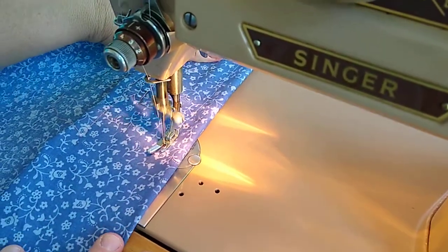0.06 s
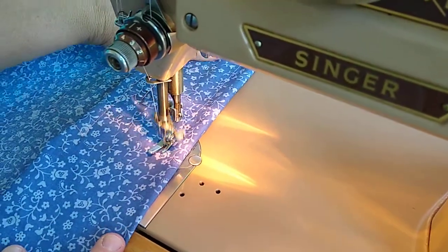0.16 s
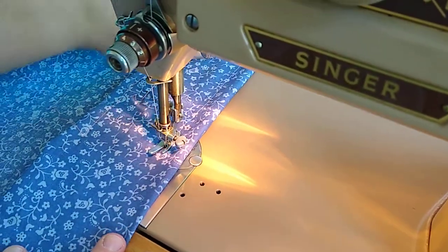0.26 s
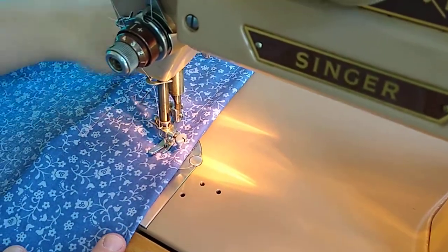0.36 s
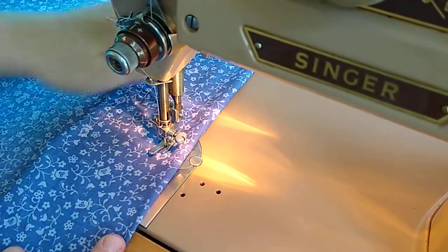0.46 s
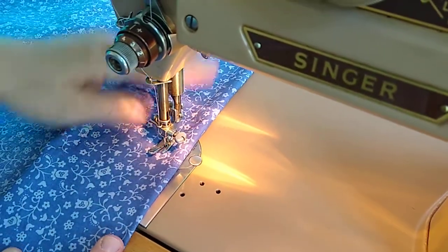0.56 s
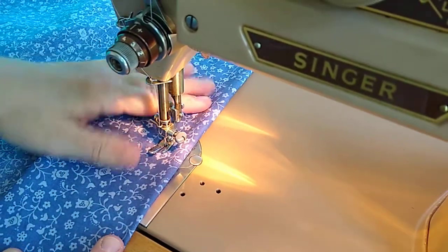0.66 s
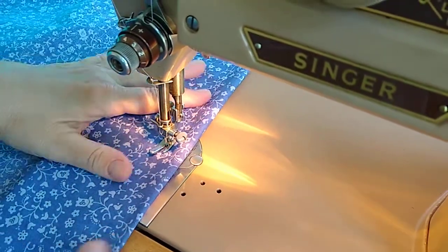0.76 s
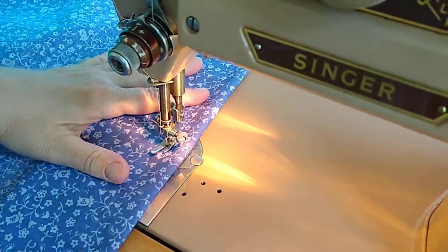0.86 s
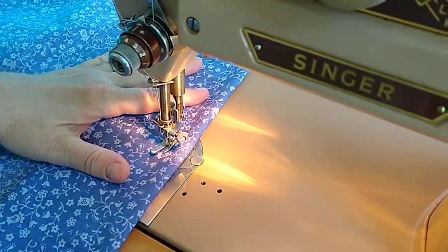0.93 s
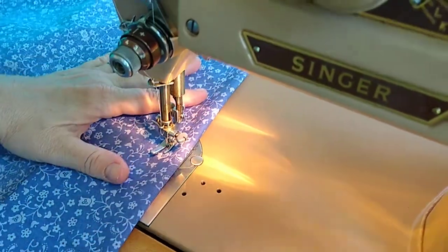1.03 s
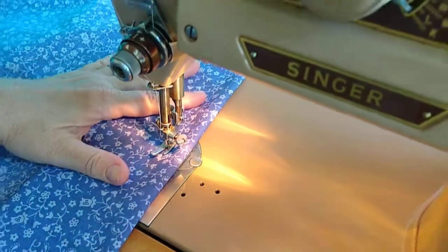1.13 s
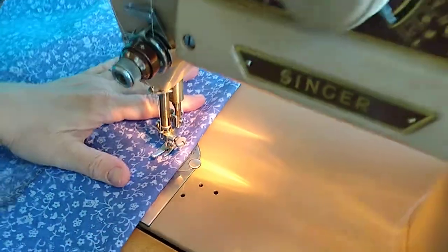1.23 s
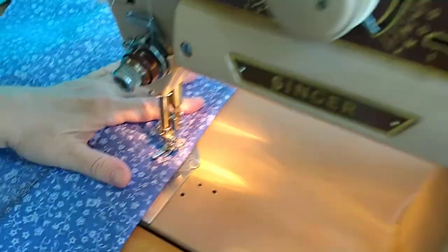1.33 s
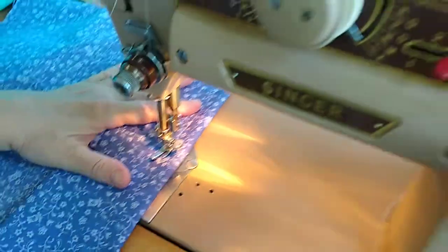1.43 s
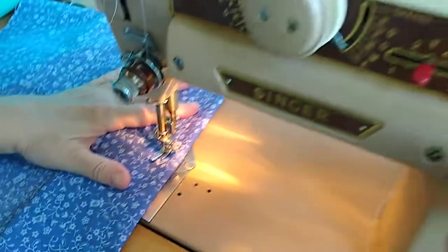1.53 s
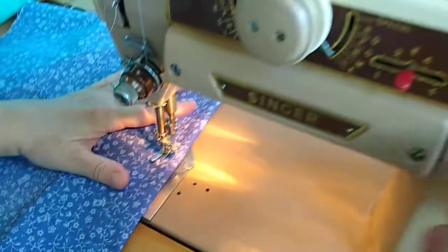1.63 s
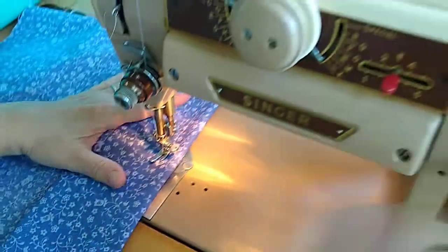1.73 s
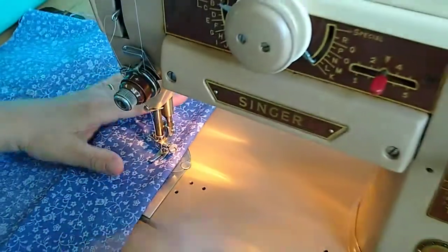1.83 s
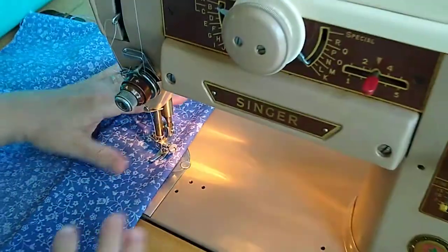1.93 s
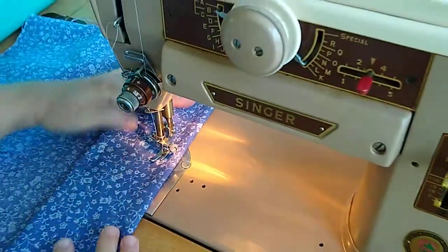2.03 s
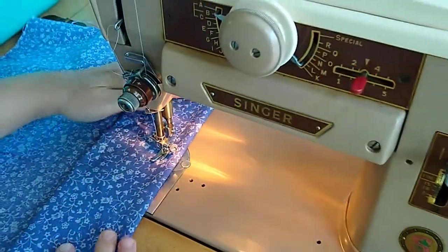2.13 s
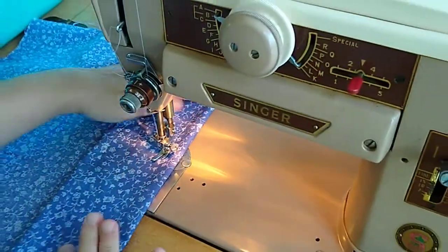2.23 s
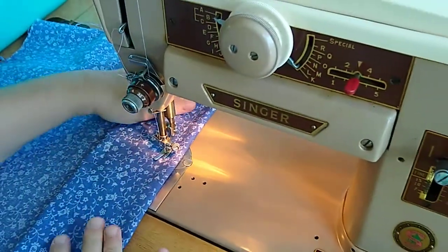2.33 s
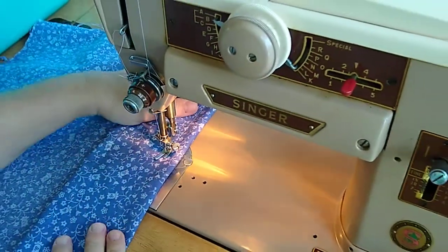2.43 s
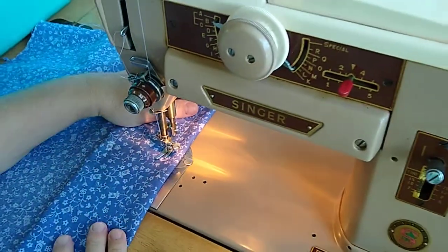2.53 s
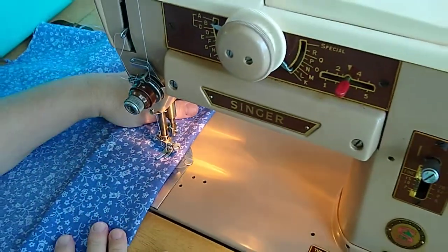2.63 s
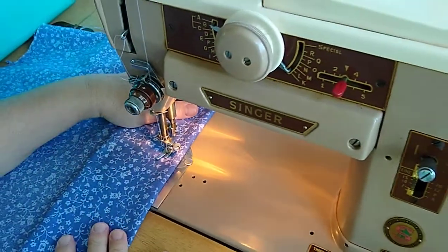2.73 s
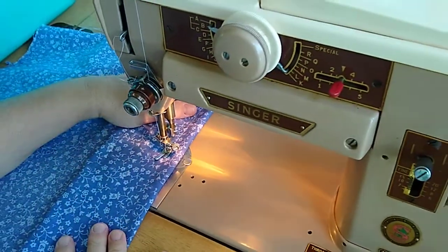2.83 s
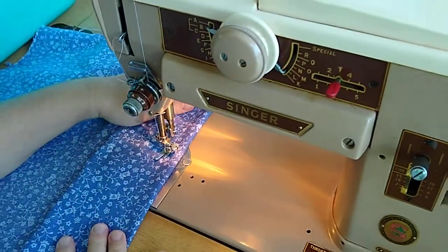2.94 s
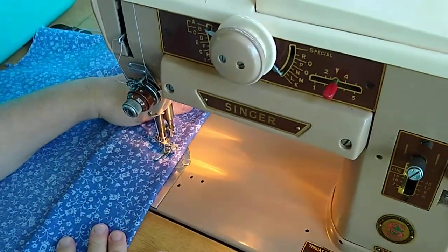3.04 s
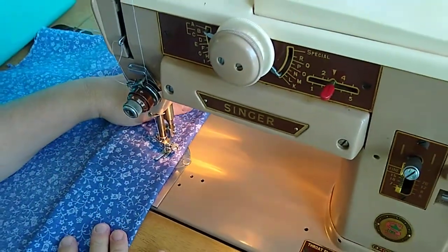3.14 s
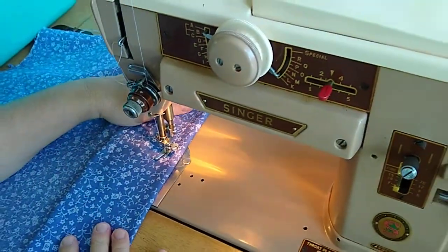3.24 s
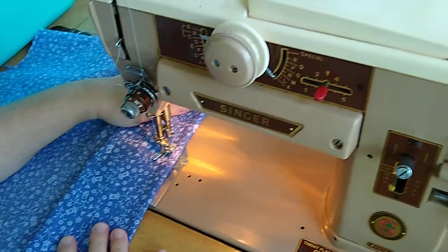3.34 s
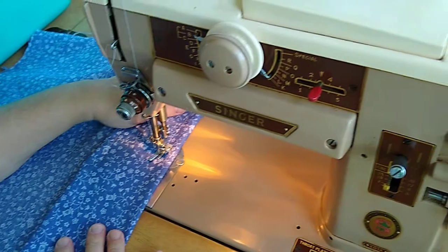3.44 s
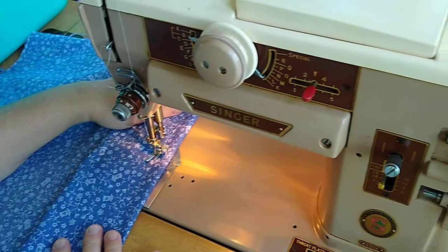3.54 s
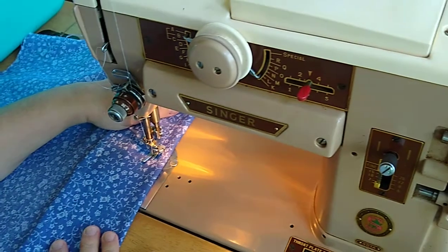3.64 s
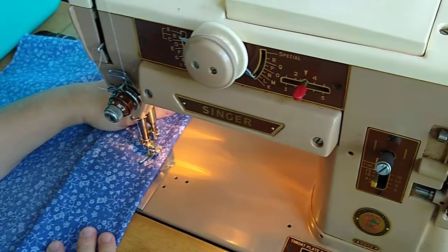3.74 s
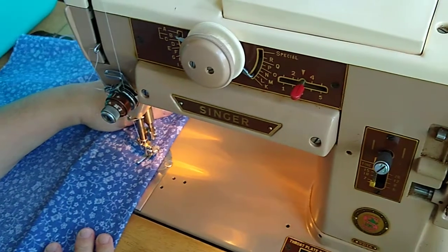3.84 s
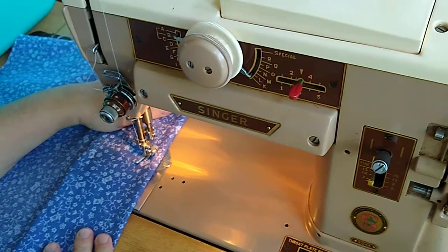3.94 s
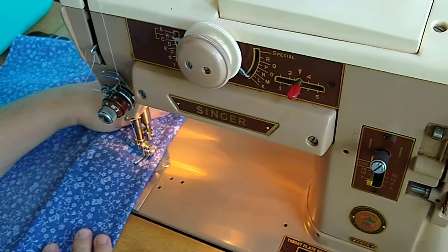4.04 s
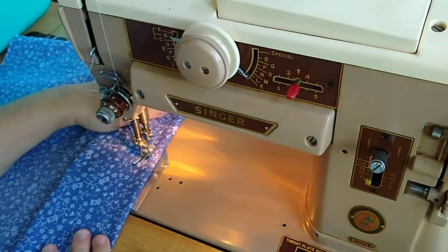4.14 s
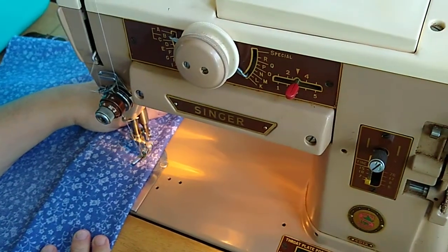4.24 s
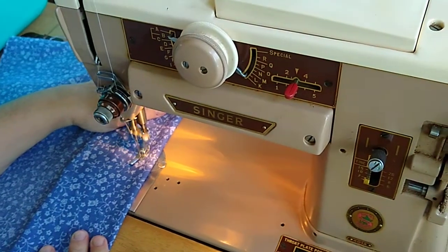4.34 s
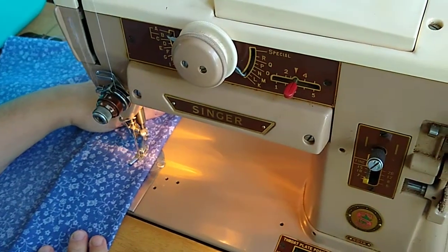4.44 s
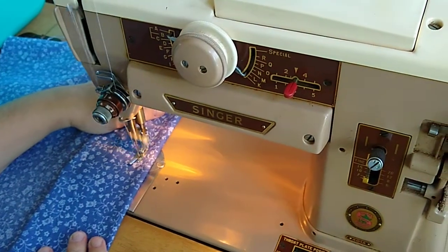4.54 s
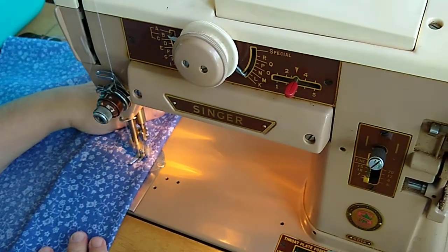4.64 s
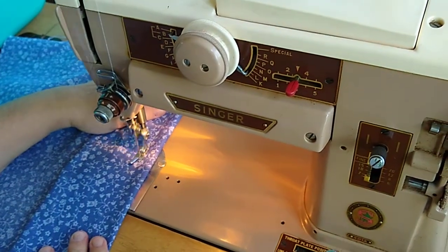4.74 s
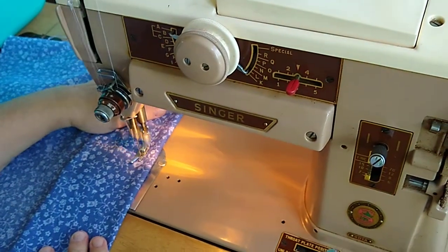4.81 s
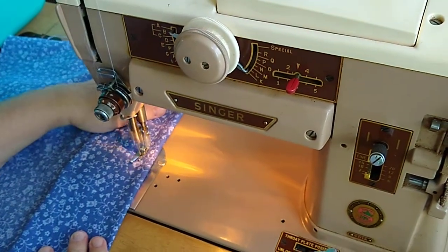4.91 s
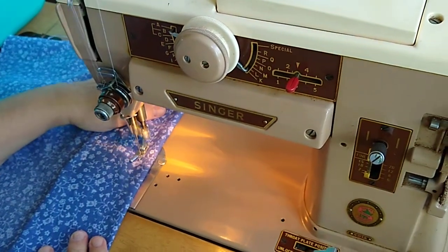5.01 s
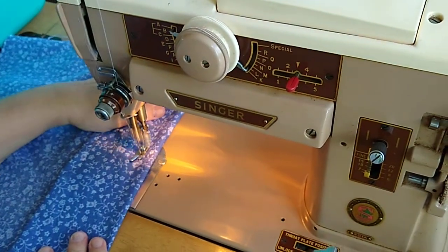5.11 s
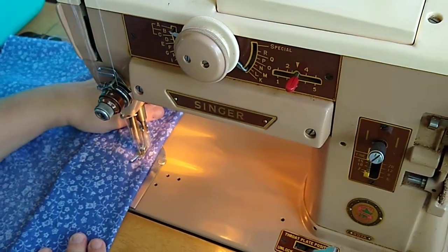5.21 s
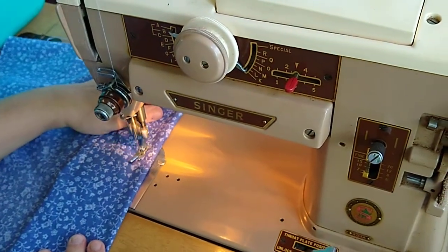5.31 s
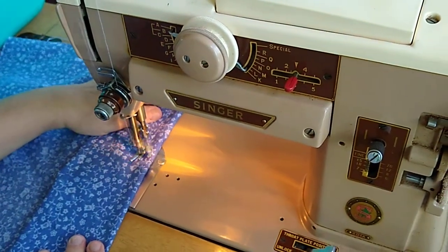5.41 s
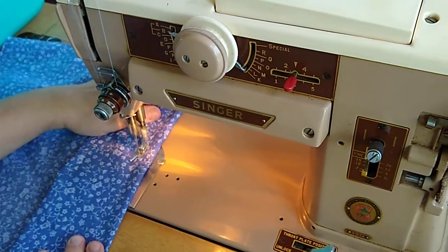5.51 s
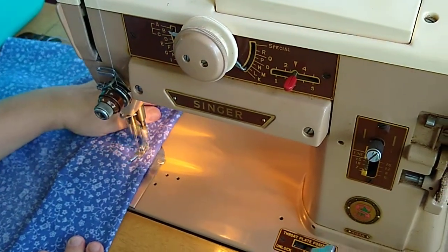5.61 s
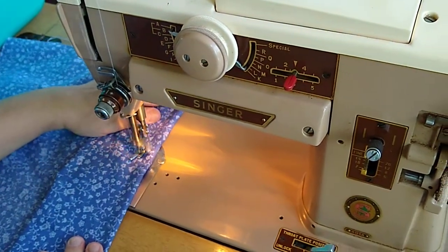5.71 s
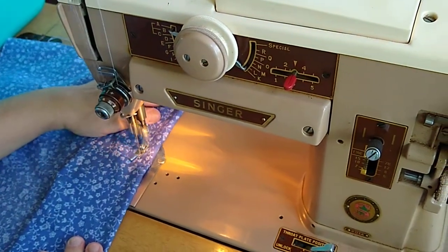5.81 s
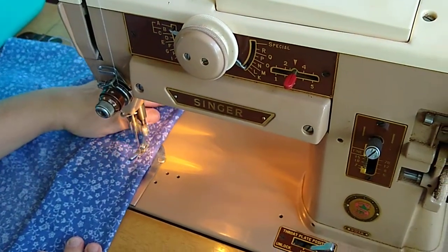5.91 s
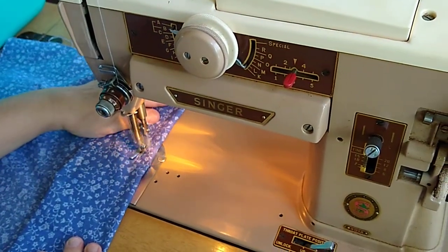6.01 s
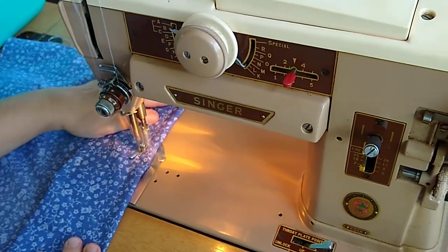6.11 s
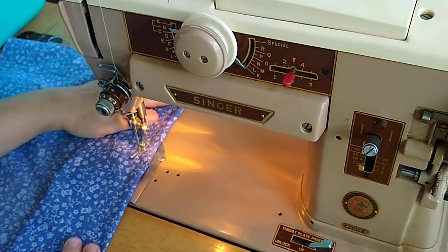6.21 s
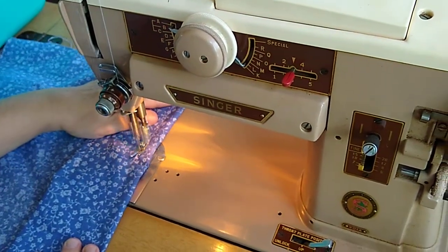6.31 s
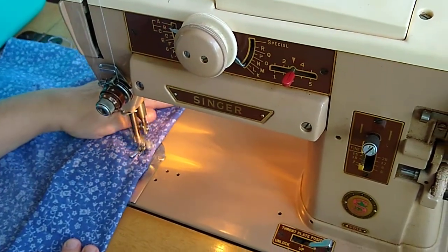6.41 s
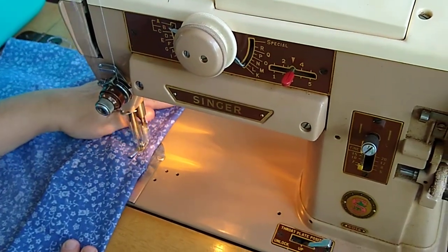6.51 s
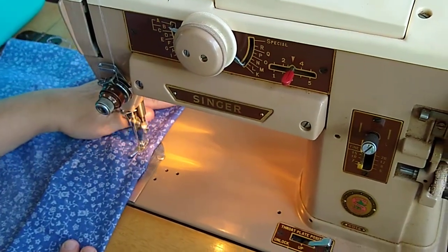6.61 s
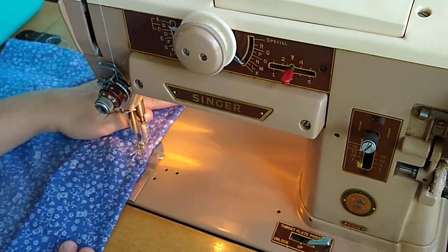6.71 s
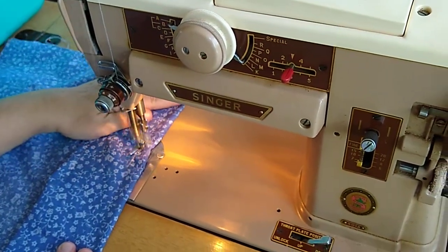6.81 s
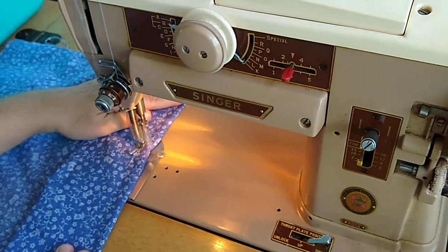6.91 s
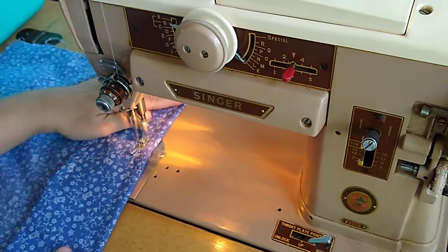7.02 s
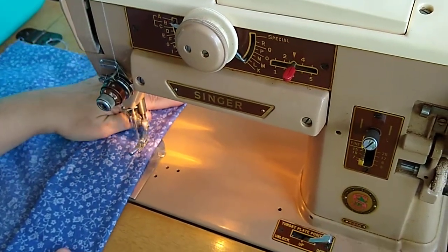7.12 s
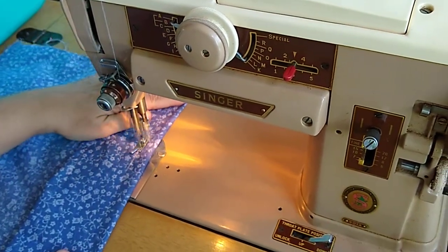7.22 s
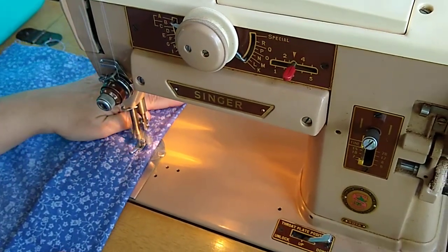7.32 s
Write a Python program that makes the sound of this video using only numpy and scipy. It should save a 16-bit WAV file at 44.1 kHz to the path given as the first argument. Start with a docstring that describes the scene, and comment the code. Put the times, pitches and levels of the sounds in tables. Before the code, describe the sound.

An old sewing machine clacks to rest, a lever snaps, a table knock follows, then the motor starts and stitching accelerates into a dense metallic clatter.

```python
"""An old electric sewing machine, close by in a small room, finishes a seam with two clacks and rests.
A lever snaps, something thumps on the table, the stalled motor buzzes; then it starts and gathers speed.
Each shaft turn is one stitch: a round of metal contacts over rattling joints, ringing in the case.
Blows are noise bursts through part resonances; whirr and drone are wavering sines, rubs shaped noise."""
import sys
import numpy as np
from scipy import signal
from scipy.fft import rfft, irfft, next_fast_len
from scipy.io import wavfile
from scipy.ndimage import map_coordinates

SR = 44100
rng = np.random.default_rng(int(sys.argv[2]) if len(sys.argv) > 2 else 0)


def generate_wav(sig):
    """Save sig (samples, or channels by samples) to the path in sys.argv[1] as 16-bit PCM at SR."""
    pcm = np.round(np.clip(np.atleast_2d(sig).T, -1, 1) * 32767).astype(np.int16)
    wavfile.write(sys.argv[1], SR, pcm)


N = 324576

FULL_SPEED = 7.5  # stitches/s

# Spectra of parts when struck or rubbed: f/Hz, relative level/dB
CASE_SPECTRUM = [(40, -34), (105, -19.5), (230, -4), (560, -5.5), (850, -5.5), (1400, -1.5), (2150, -5),
                 (2900, -4.5), (4400, -17.5), (5400, -12.5), (7200, -26.5), (15000, -30.5)]
STEEL_SPECTRUM = [(100, -64.5), (2000, -31), (5000, 3.5), (7200, -8), (10000, -5), (12000, -4),
                  (15000, -6.5)]
TABLE_SPECTRUM = [(25, -48), (50, -30), (90, -15.5), (160, -7.5), (280, -3.5), (420, -7), (750, -10.5),
                  (1100, -10.5), (1700, -24), (5000, -38), (15000, -68.5)]
# Resonances on those spectra: f/Hz, width/Hz, gain/dB
CASE_PEAKS = [(181.7, 12, 13.5), (245.7, 11, 9.5), (286.4, 14, 10), (366, 34, 4), (477, 18, 6),
              (535, 40, 10), (579.6, 30, 7.5), (614.8, 23, 9.5), (744.4, 18, 11), (850, 46, 2),
              (1032, 130, 6.5), (1308, 59, 4.5), (1462, 52, 7), (1710, 26, 1), (1916, 45, 9),
              (2720, 34, 1.5), (2930, 30, 2.5), (3010, 20, 6), (3353, 46, 4), (4000, 110, 9.5),
              (4890, 96, 4.5), (5650, 250, 2)]
STEEL_PEAKS = [(8460, 88, 9.5), (10400, 210, 4.5), (10740, 110, 11), (11250, 250, 4.5), (12700, 220, -4),
               (13440, 400, 4)]
# Lever snaps and their rattles: t/s, casting relative level/dB, steel relative level/dB
LEVER_SNAPS = [(0.441, -58, -55), (1.135, -67, -85), (1.477, -28, -21.5), (1.492, -45, -47.5),
               (1.507, -50.5, -57), (1.516, -51, -57), (1.523, -59, -57), (1.534, -55, -60),
               (1.543, -58, -60), (1.557, -62, -64), (1.561, -59, -66), (1.7491, -47, -45),
               (1.954, -84, -69.5), (4.295, -76, -69)]


def amp(db):
    """Amplitude ratio of a level in dB."""
    return 10 ** (np.asarray(db) / 20)


def unit(x):
    """Scale to RMS 1."""
    return x / np.sqrt(np.mean(x ** 2) + 1e-20)


def along(points, hz):
    """Interpolate (f/Hz, value) points on a log frequency axis."""
    f, v = np.transpose(points)
    return np.interp(np.log(hz + 1), np.log(f + 1), v)


def curves(rows):
    """One value per sample for each column after the time."""
    s, *cols = np.transpose(rows)
    return [np.interp(np.arange(N) / SR, s, c) for c in cols]


def wobble(knots_per_s):
    """Smooth random curve through normally distributed knots."""
    knots = rng.standard_normal(int(N * knots_per_s / SR) + 4)
    return map_coordinates(knots, [np.arange(N) * knots_per_s / SR])


def filtered(x, response):
    """Apply a complex frequency response."""
    m = next_fast_len(x.shape[-1] + SR // 4)
    return irfft(rfft(x, m) * response(np.fft.rfftfreq(m, 1 / SR)), m)[..., :x.shape[-1]]


def leaned(x, left_minus_right):
    """Tilt the stereo balance by (f/Hz, left minus right/dB), half on each channel."""
    return filtered(x, lambda hz: amp(along(left_minus_right, hz) * np.array([[.5], [-.5]])))


def coloured(x, spectrum, peaks=(), size=8192):
    """Minimum-phase filter with this spectrum and these resonances."""
    hz = np.fft.rfftfreq(size, 1 / SR)
    db = along(spectrum, hz) + sum(g / (1 + (2 * (hz - f) / w) ** 2) for f, w, g in peaks)
    cepstrum = irfft(np.log(amp(db)))
    # Fold onto positive time: makes the filter causal
    cepstrum[1:size // 2] *= 2
    cepstrum[size // 2 + 1:] = 0
    impulse = irfft(np.exp(rfft(cepstrum)))
    return signal.fftconvolve(x, impulse[None], axes=1)[:, :x.shape[1]]


def add(track, s, sound):
    """Mix a stereo sound in at time s."""
    i = int(np.clip(round(s * SR), 0, N - 1))
    track[:, i:i + sound.shape[1]] += sound[:, :N - i]


def ports(size, apart):
    """Noise at two pickup ports: direct part 14 samples later at the left, plus an independent part."""
    near = rng.standard_normal(size)
    direct = np.array([np.roll(near, 14), near])
    return direct + apart * rng.standard_normal((2, size))


def contact(crack_t60_s, tail_db):
    """One blow at both ports, total power 1: a short crack, then the ring of case and room."""
    # Decay of case and room: f/Hz, t60/s
    ring_t60 = [(100, 0.41), (300, 0.36), (1000, 0.21), (3000, 0.24), (8000, 0.22), (15000, 0.11)]
    t = np.arange(SR // 4) / SR
    hz, frame_s, z = signal.stft(ports(size=len(t), apart=1.93), SR, nperseg=128)
    decay = amp(-60 * frame_s / along(ring_t60, hz)[:, None])
    tail = signal.istft(z * decay, SR, nperseg=128)[1][:, :len(t)]
    crack = ports(size=len(t), apart=1.0) * amp(-60 * t / crack_t60_s)
    return unit(unit(crack) + amp(tail_db) * unit(tail)) / np.sqrt(len(t))


def ringing(modes, scatter_db=2):
    """Decaying modes struck once, with random phase and scattered level."""
    t = np.arange(SR // 2) / SR
    ring = 0
    for hz, db, t60_s in modes:
        envelope = amp(db + scatter_db * rng.standard_normal() - 60 * t / t60_s)
        ring = ring + envelope * np.sin(2 * np.pi * (hz * t + rng.random()))
    return (ring * (1 - np.exp(-t / 0.00093)))[None]


def shaft():
    """Shaft speed in stitches/s, and turns counted from the needle meeting the cloth."""
    # Shaft speed: t/s, speed/(stitches/s)
    speed_points = [(4.43, 0), (4.445, 2.5), (4.72, 3), (4.83, 4), (5, 4.5), (5.32, 6), (5.65, 6.5),
                    (6.25, 7), (6.9, 7.5), (7.36, 7.5)]
    needle_at_s = 4.83
    speed = np.maximum(curves(speed_points)[0], 0)
    turns = np.cumsum(speed) / SR
    return speed, turns - turns[int(needle_at_s * SR)]


def doublings(speed):
    """Doublings of speed above full speed; far below zero at rest."""
    return np.log2(speed / FULL_SPEED + 1e-6)


def clatter(column, rattle_db, rattles_per_turn, scatter_db, crack_t60_s, tail_db, joints=2):
    """Contacts of each stitch plus loose joints rattling at an even pace; mean power stays nearly even."""
    # Contacts of needle, hook, take-up lever, feed:
    # place/turn, knock relative level/dB, tick relative level/dB
    stitch_contacts = [(0, -3.5, -5.5), (.07, -6, -11), (.22, -8, -9.5), (.37, -12, -14.5), (.55, -5, -4),
                       (.68, -17.5, -11), (.84, -22, -25)]
    contact_play = .008  # share of a turn
    rattle_play = .15  # share of a rattle interval
    speed, turns = shaft()
    stitches = np.arange(np.floor(turns[0]), turns[-1] + 1)

    def strikes(places, db):
        """One part struck at these places of the shaft's travel."""
        at = np.searchsorted(turns, places)
        size = amp(db + scatter_db * rng.standard_normal(400)[:len(at)])
        heard = (at > 0) & (at < N)
        # Offset the power gained from more blows per second
        blows = np.bincount(at[heard], size[heard], N) * np.sqrt(SR / (speed + 1))
        return signal.oaconvolve(blows[None], contact(crack_t60_s, tail_db), axes=1)[:, :N]

    out = np.zeros((2, N))
    for row in stitch_contacts:
        places = stitches + row[0] + rng.normal(0, contact_play, len(stitches))
        out += strikes(places, row[column])
    slots = np.arange(stitches[0], turns[-1], 1 / rattles_per_turn)
    for joint in range(joints):
        offset = joint / joints + rng.normal(0, rattle_play, len(slots))
        places = slots + offset / rattles_per_turn
        out += strikes(places, rattle_db) / np.sqrt(rattles_per_turn * joints)
    return out


def machine():
    """The turning mechanism knocks in the case and ticks in its steel parts, louder and brighter with speed."""
    case_db, case_db_per_doubling = -32, 8.5  # level at full speed, growth
    steel_db, steel_db_per_doubling = -45.5, 13.5
    speed, _ = shaft()
    running = speed > 2
    blows = clatter(column=1, rattle_db=2.5, rattles_per_turn=14, scatter_db=1, crack_t60_s=.022, tail_db=3)
    taps = clatter(column=2, rattle_db=3, rattles_per_turn=9, scatter_db=3, crack_t60_s=.018, tail_db=2)
    case_knocks = coloured(blows, CASE_SPECTRUM, CASE_PEAKS)
    steel_ticks = coloured(taps, STEEL_SPECTRUM, STEEL_PEAKS)
    case_gain = amp(case_db + case_db_per_doubling * doublings(speed))
    steel_gain = amp(steel_db + steel_db_per_doubling * doublings(speed))
    case = case_gain * case_knocks / np.std(case_knocks[:, running])
    steel = steel_gain * steel_ticks / np.std(steel_ticks[:, running])
    return case + steel


def whirr_tone():
    """Armature pitch in Hz and level in dB, both rising with shaft speed."""
    full_speed_hz, hz_per_stitch_per_s = 469.9, 62
    full_speed_db, db_per_doubling = -47, 14.5
    speed, _ = shaft()
    hz = full_speed_hz + hz_per_stitch_per_s * (speed - FULL_SPEED)
    return hz, full_speed_db + db_per_doubling * doublings(speed)


def motor():
    """The armature whirrs higher as it speeds up; the shaken mount drones at fixed pitches."""
    # Motor shaking its mount: t/s, relative level/dB
    drone_level = [(4.1, -75), (4.3, -70), (4.41, -72.5), (4.47, -58), (6.33, -52), (7.36, -58)]
    # Mount pitches: f/Hz, relative level/dB, phase waver/rad
    drone_lines = [(86.1, -2.5, 0.15), (135, -8.5, 0.86), (235.5, -3.5, 0.94)]
    t = np.arange(N) / SR
    hz, db = whirr_tone()
    phase = 2 * np.pi * np.cumsum(hz * (1 + 0.0061 * wobble(14))) / SR
    whirr = amp(db + 3.3 * wobble(12)) * np.sin(phase)
    drone_db, = curves(drone_level)
    drone = 0
    for f, line_db, waver_rad in drone_lines:
        line = np.sin(2 * np.pi * f * t + waver_rad * wobble(15))
        drone = drone + amp(line_db + 0.37 * wobble(12.0)) * line
    fade_in = np.clip((t - 4) / .15, 0, 1)
    # Drone leans left, most at its deepest pitch
    return whirr + leaned(fade_in * amp(drone_db + 5.0) * drone, [(110, 9.6), (200, 6.8)])


def gears():
    """Gear teeth strike at half the whirr pitch, a fine regular chatter in the case."""
    tooth_play = .025  # scatter, share of a tooth interval
    hz, db = whirr_tone()
    tooth_count = np.floor(np.cumsum(hz / 2) / SR + tooth_play * wobble(150))
    teeth = np.diff(tooth_count, prepend=0) * amp(2.4 * wobble(90))
    chatter = signal.oaconvolve(teeth[None], contact(crack_t60_s=.025, tail_db=-6), axes=1)[:, :N]
    return amp(db + 1.0) * unit(coloured(chatter, CASE_SPECTRUM, CASE_PEAKS))


def belt():
    """The belt drags on the shaft as it comes up to speed: noise shaped to a low rubbing growl."""
    # Drag of the belt, which strains, slips, then grips and fades: t/s, relative level/dB
    drag_level = [(3.9, -87), (4.43, -54), (4.52, -42), (4.72, -41), (4.78, -46.5), (4.86, -42), (5.5, -45),
                  (5.9, -48), (7.36, -61)]
    # Rubbing belt: f/Hz, relative level/dB
    belt_spectrum = [(100, -34), (190, -28), (225, -6.5), (252, 1.5), (295, -3), (330, -22), (380, -3),
                     (450, -11.5), (600, -18), (1200, -14), (3000, -60)]
    db, = curves(drag_level)
    return amp(db + 0.48 * wobble(22)) * unit(coloured(ports(size=N, apart=1.0), belt_spectrum))


def clacks():
    """A joint takes up its play with a harder blow, which also jolts the table and rings the frame."""
    # Hardest clacks: t/s, then relative level/dB of case, steel, table
    clack_events = [(.002, -33, -56, -39), (0.034, -42, -66, -31), (0.0407, -18, -39, -35),
                    (0.0463, -28, -51, -34), (0.057, -34, -62, -32), (.064, -42, -65, -34),
                    (.1, -40, -70, -49), (.132, -50, -68, -44), (.143, -32, -62, -39),
                    (0.148, -20, -44, -38.5), (.158, -42, -62, -34.5), (.193, -48, -71, -46),
                    (4.443, -26, -54, -47), (4.459, -37, -44, -48), (4.487, -36, -46, -41),
                    (4.589, -24, -44.5, -40), (4.657, -30, -44, -41), (4.832, -29, -37, -35),
                    (4.885, -21, -49, -42), (4.963, -31, -60, -46), (5.055, -30, -40, -48),
                    (5.101, -21, -42, -33), (5.165, -34, -57, -42), (5.288, -20.5, -42, -35),
                    (5.312, -23.5, -42, -44), (5.44, -20, -52, -49), (5.454, -19.5, -37, -43),
                    (5.47, -24, -52, -26), (5.505, -28, -42, -33), (5.578, -21, -37.5, -51),
                    (5.68, -27.5, -50, -30), (5.747, -22.5, -49, -46), (5.784, -19, -53, -40),
                    (5.847, -25.5, -46, -49), (5.887, -30, -34.5, -39), (5.917, -28, -41, -46.5),
                    (6.02, -24, -46, -42), (6.075, -21.5, -36, -39), (6.25, -20.5, -49.5, -38),
                    (6.398, -20.5, -47, -40), (6.471, -21.5, -40, -36), (6.523, -21.5, -48, -36),
                    (6.733, -19, -46, -44), (6.785, -20.5, -46, -40), (6.841, -18, -39, -46),
                    (6.855, -22, -40, -38), (6.913, -25, -46, -44), (6.993, -18, -47, -38),
                    (7.04, -23, -40, -52), (7.116, -23.5, -46, -42), (7.223, -31, -32, -48),
                    (7.294, -20.5, -45, -40)]
    # Ringing frame: f/Hz, relative level/dB, t60/s
    frame_modes = [(291.5, -5, 0.26), (532.6, -1, .12), (730, -5.5, 0.13), (815, 0.5, 0.067),
                   (925, -6, 0.11), (1507, -3, 0.082), (1608, 3.5, 0.044), (3140, -20, .11)]
    case, steel, table, frame = np.zeros((4, 2, N))
    for s, db, steel_db, table_db in clack_events:
        add(case, s + 0.000998, amp(db + 23.5) * contact(crack_t60_s=0.035, tail_db=-9.5))
        add(steel, s + 0.00093, amp(steel_db + 25.0) * contact(crack_t60_s=.022, tail_db=-9))
        add(table, s, amp(table_db + 39.5) * contact(crack_t60_s=0.048, tail_db=-3.5))
        add(frame, s + 0.00093, amp((db + table_db) / 2 - 13) * ringing(frame_modes))
    metal = coloured(case, CASE_SPECTRUM, CASE_PEAKS) + coloured(steel, STEEL_SPECTRUM, STEEL_PEAKS)
    return metal + coloured(table, TABLE_SPECTRUM) + frame


def sliding():
    """Joints slide with a rough rub as the machine comes to rest and as it starts again."""
    # Sliding joints: t/s, relative level/dB
    slide_level = [(0, -44), (.12, -60), (.3, -65), (.7, -100), (4.435, -100), (4.447, -52.5),
                   (4.72, -42.5), (4.79, -52), (4.85, -46), (5.3, -44.5), (7.36, -51)]
    db, = curves(slide_level)
    rub = unit(coloured(ports(size=N, apart=0.99), CASE_SPECTRUM, CASE_PEAKS))
    return amp(db + 2.5 * wobble(90)) * rub


def landings():
    """Each bump on the table and its rebound: t/s, relative level/dB."""
    # Bumps: t/s, relative level/dB
    bumps = [(3.472, -38), (4.045, -68)]
    rebound_s, rebound_db = 0.0066, 1
    return bumps + [(s + rebound_s, db + rebound_db) for s, db in bumps]


def hand_blows():
    """Snaps go mostly into metal, bumps into the table: t/s, then table, casting, steel relative level/dB."""
    snap_table_db = -14.5  # table against casting
    bump_casting_db, bump_steel_db = -18.5, -39  # against table
    snaps = [(s, db + snap_table_db, db, steel_db) for s, db, steel_db in LEVER_SNAPS]
    return snaps + [(s, db, db + bump_casting_db, db + bump_steel_db) for s, db in landings()]


def knocks():
    """Each hand blow clicks in steel, cracks in the casting and booms in the table."""
    # Casting: f/Hz, relative level/dB
    casting_spectrum = [(40, -48), (150, -30), (500, -6.5), (720, -6), (950, 4), (1500, -6.5), (2100, 4),
                        (3000, -2), (4300, -10), (5800, -15.5), (7400, -24), (15000, -23)]
    # Snapping lever: f/Hz, relative level/dB
    lever_spectrum = [(100, -64), (2000, -24), (3200, -7), (5000, -2.5), (6500, -12), (8500, -6),
                      (10000, -5.5), (12000, -4), (15000, -7.5)]
    # Lever resonances: f/Hz, width/Hz, gain/dB
    lever_peaks = [(7800, 1900, -2.5), (8600, 165, 10.5), (11000, 202, 11.5), (11260, 340, 5),
                   (13700, 620, 10), (14120, 150, 10)]
    # Ringing table: f/Hz, relative level/dB, t60/s
    table_modes = [(250.7, 4, 0.2), (295, -1, .22), (417, -8, .22), (576, 8, 0.14), (730, -13, 0.17),
                   (800, -17, .25), (1018, -10, 0.13), (1216, -9.5, 0.11)]
    table, casting, steel, boom = np.zeros((4, 2, N))
    t = np.arange(SR // 2) / SR
    swell = 1 - np.exp(-t / 0.0042)  # the heavy table top takes a moment to start swinging
    for s, table_db, casting_db, steel_db in hand_blows():
        add(table, s, amp(table_db + 47.5) * contact(crack_t60_s=0.06, tail_db=5.5))
        add(casting, s + 0.00129, amp(casting_db + 36.5) * contact(crack_t60_s=0.044, tail_db=-17.5))
        add(steel, s + 0.0016, amp(steel_db + 25.0) * contact(crack_t60_s=0.019, tail_db=-19.5))
        add(boom, s + 0.0019, amp(table_db - 3.5) * swell * ringing(table_modes))
    metal = coloured(casting, casting_spectrum) + coloured(steel, lever_spectrum, lever_peaks)
    return coloured(table, TABLE_SPECTRUM) + metal + boom


def casting_ring():
    """Each snap of a lever, and each rattle after it, rings the casting."""
    # Ringing casting: f/Hz, relative level/dB, t60/s
    casting_modes = [(300, -11, 0.18), (658, -10.5, 0.14), (877, -12, .14), (947, -4, 0.083),
                     (1155, -8, .08), (1700, -12.5, .06), (2140, -5, .05), (2750, -12.5, .05),
                     (3080, -19, .12), (3280, -20.5, .11), (3456, -19.5, .1)]
    out = np.zeros((2, N))
    for s, db, _ in LEVER_SNAPS:
        add(out, s + 0.0018, amp(db - 5.5) * ringing(casting_modes))
    return out


def thuds():
    """Each landing of a bump gives a firm, hollow knock: decaying sines with a short attack."""
    # Hollow knock: f/Hz, relative level/dB, t60/s
    hollow_modes = [(146, -8, 0.1), (235, -1, 0.075), (434, 10, 0.032), (502, 1, 0.093), (865, -1, .04),
                    (1114, 0.5, 0.043), (2600, -16, 0.11)]
    attack_s = 0.001
    out = np.zeros((2, N))
    t = np.arange(SR // 4) / SR
    modes = sum(amp(db - 60 * t / t60_s) * np.sin(2 * np.pi * hz * t) for hz, db, t60_s in hollow_modes)
    knock = modes * (1 - np.exp(-t / attack_s))
    for s, db in landings():
        add(out, s, amp(db) * knock[None])
    return signal.sosfilt(signal.butter(2, 100, "high", fs=SR, output="sos"), out)


def buzz():
    """The stalled motor under current crackles twice per mains cycle; its housing smears the sparks."""
    # Motor under current before it turns: t/s, relative level/dB
    buzz_level = [(2.2, -100), (2.3, -73.5), (2.5, -80), (2.6, -72), (3.3, -67), (3.48, -65), (3.56, -75),
                  (3.8, -76), (4.1, -72.5), (4.2, -73.5), (4.43, -71), (4.5, -100)]
    # Housing: f/Hz, relative level/dB
    housing_spectrum = [(900, -23), (1700, -32), (1920, 5), (2100, -8), (2600, 0.5), (2900, -5), (3350, 3),
                        (3600, -15.5), (3950, -1.5), (4300, -14.5), (5000, -6.5), (7000, -29),
                        (9000, -21.5), (11500, -18.5), (15000, -30)]
    mains_hz = 60
    fizz_db = -2  # ragged part against steady beat
    db, = curves(buzz_level)
    sparks = np.diff(np.floor(np.arange(N + 1) * 2 * mains_hz / SR))
    steady = signal.oaconvolve(sparks[None], contact(crack_t60_s=.012, tail_db=-6), axes=1)[:, :N]
    spark_decay = signal.lfilter([1], [1, -np.exp(-1 / (0.006 * SR))], sparks)
    fizz = spark_decay * rng.standard_normal((2, N))
    crackle = unit(steady) + amp(fizz_db) * unit(fizz)
    return amp(db) * unit(coloured(crackle, housing_spectrum))


def handling():
    """Hands smooth cotton and nudge the table, as noise swells; faint squeaks are rough gliding sines."""
    # Hands sliding on cotton: t/s, length/s, relative level/dB
    cotton_rubs = [(0.682, .26, -78.5), (2.25, .18, -87)]
    # Soft, dull table nudges: t/s, length/s, relative level/dB
    table_nudges = [(2.754, 0.072, -64), (3.031, 0.078, -63), (3.33, 0.074, -55.5), (3.79, .06, -59.5),
                    (4.025, 0.064, -54.5)]
    # Nudged table: f/Hz, relative level/dB
    nudge_spectrum = [(60, -25.5), (150, -4), (300, -5.5), (560, 0), (1100, -11), (2000, -24), (8000, -50)]
    # Squeaks: t/s, length/s, start f/Hz, end f/Hz, relative level/dB
    squeak_glides = [(.28, .26, 3100, 2900, -69.5), (.46, .2, 2620, 2660, -73),
                     (1.07, .19, 2880, 2760, -69), (1.0, .36, 2450, 2000, -73)]
    squeak_rough = .028  # pitch jitter, share of f
    out = np.zeros((2, N))
    for s, length_s, db in cotton_rubs:
        swell = np.hanning(int(length_s * SR))
        rub = unit(coloured(rng.standard_normal((2, len(swell))), STEEL_SPECTRUM))
        add(out, s, amp(db) * swell * rub)
    for s, length_s, db in table_nudges:
        swell = np.hanning(int(length_s * SR))
        nudge = unit(coloured(ports(size=len(swell), apart=0.78), nudge_spectrum))
        add(out, s, amp(db) * swell * nudge)
    for s, length_s, start_hz, end_hz, db in squeak_glides:
        swell = np.hanning(int(length_s * SR))
        glide_hz = np.linspace(start_hz, end_hz, len(swell))
        hz = glide_hz * (1 + squeak_rough * wobble(700)[:len(swell)])
        broken = amp(db + 4.9 * wobble(48)[:len(swell)])
        add(out, s, broken * swell[None] * np.sin(2 * np.pi * np.cumsum(hz) / SR))
    return out


def room():
    """A soft steady rush of noise with a few low resonances, and a faint hum of wavering sines."""
    # Rush: f/Hz, relative level/dB
    air_spectrum = [(25, -34.5), (60, -12.5), (100, -3), (200, -4), (290, -4), (380, -6.5), (520, -7),
                    (800, -6), (1700, -15.5), (2600, -15.5), (4500, -25.5), (7500, -36.5), (11000, -36.5),
                    (15000, -38.5)]
    # Hum: f/Hz, relative level/dB
    hum_lines = [(178, -78.5), (291, -74), (481, -75), (657, -77)]
    # f/Hz, width/Hz, gain/dB
    air_peaks = [(177, 16, 7.8), (236, 17, 8.0), (489, 65, 9.1), (578, 27, 9.3), (653, 15, 2.3)]
    t = np.arange(N) / SR
    air = coloured(rng.standard_normal((2, N)), air_spectrum, air_peaks)
    hum = sum(amp(db) * np.sin(2 * np.pi * hz * t + 1.4 * wobble(3.21)) for hz, db in hum_lines)
    return amp(-61.5 + 0.78 * wobble(7.4)) * unit(air) + hum


def scene():
    """Sum the layers; all but the motor share one stereo lean."""
    # Stereo lean: f/Hz, left minus right/dB
    lean_points = [(200, 2.5), (3000, -2), (5000, 1.5), (8500, 7.5), (15000, 7)]
    running = machine() + gears() + belt() + clacks() + sliding()
    near = running + knocks() + casting_ring() + thuds() + buzz() + handling()
    return leaned(near + room(), lean_points) + motor()


def record(dry):
    """Each channel is one port minus a delayed share of the other, which combs mid and side in turn."""
    # Share of the other port: f/Hz, share/1
    crossfeed = [(400, 0.047), (1100, 0.52), (2250, 0.77), (4500, 0.46), (6700, 0.42), (10000, 0.013)]
    # Stereo width: f/Hz, side gain/dB
    width = [(60, 3), (200, -3.5), (600, -5), (1100, -13), (1400, -4.5), (1800, -4), (2600, 0)]
    top_hz = 15700  # centre of a 600 Hz wide cutoff

    def share(hz):
        return np.clip(along(crossfeed, hz), 0, 1)

    def other(hz):
        return share(hz) * np.exp(-2j * np.pi * hz / 2250)  # delay 1/2250 s

    def even(hz):
        """Treble cutoff, and gain that evens out the mean power of the combs."""
        return np.clip((top_hz - hz) / 600 + .5, 0, 1) / np.hypot(1, share(hz))

    mid = filtered((dry[0] + dry[1]) / 2, lambda hz: (1 - other(hz)) * even(hz))
    side = filtered((dry[0] - dry[1]) / 2, lambda hz: (1 + other(hz)) * even(hz) * amp(along(width, hz)))
    return np.array([mid + side, mid - side])


dry = scene()
out = record(dry)
generate_wav(out)
```